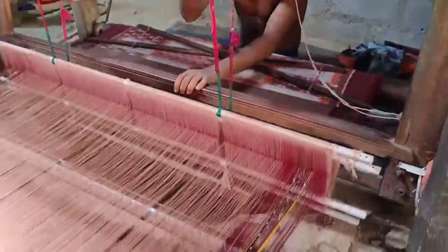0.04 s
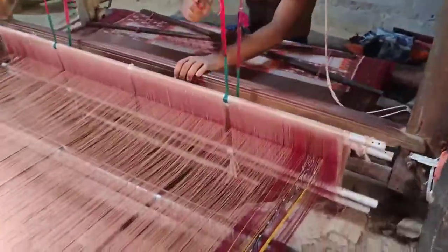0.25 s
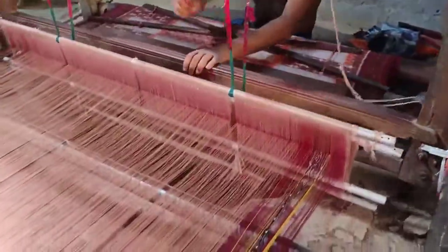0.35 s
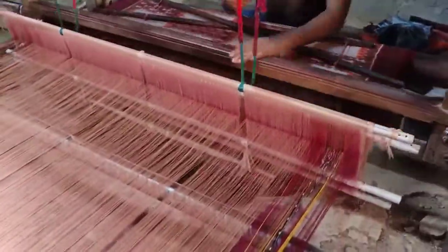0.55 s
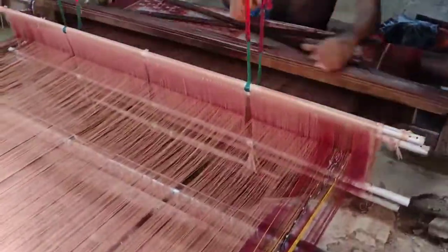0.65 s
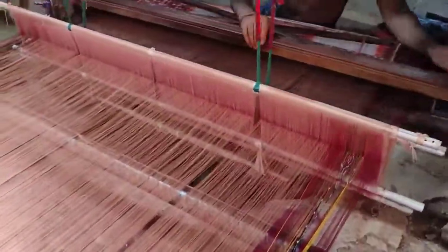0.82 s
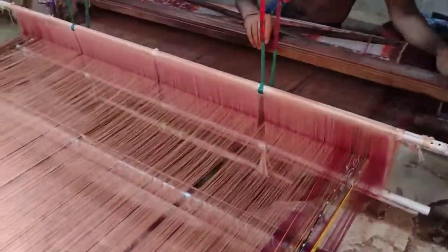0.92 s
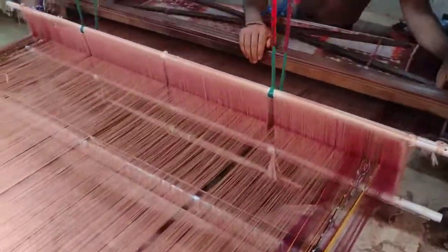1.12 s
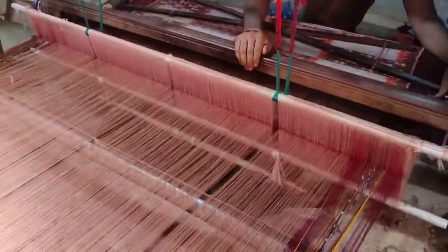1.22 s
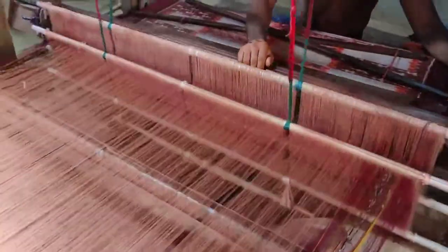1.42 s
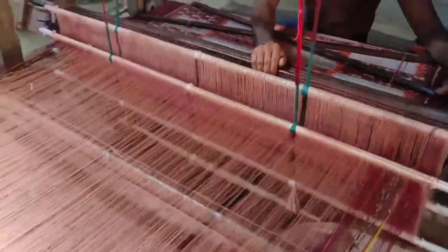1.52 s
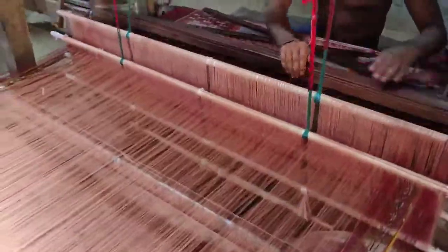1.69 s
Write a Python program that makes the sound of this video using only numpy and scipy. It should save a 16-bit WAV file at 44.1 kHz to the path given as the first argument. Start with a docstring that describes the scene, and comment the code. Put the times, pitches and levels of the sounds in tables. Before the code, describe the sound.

In a small, faintly humming room, a nearby handloom gives a quick run of wooden clacks ending in one loud slam. A soft beater thud with a slight rattle follows, then light knocks and rustling threads.

```python
"""In a hard-walled room, a wooden handloom weaves one thread over a low hum.
A wooden block (the picker) flicks the shuttle, which slides across, slams into its box and rebounds.
The beater presses the new thread home, and its comb (the reed) rattles. Then the sticks and frames that
lift the lengthwise threads (the heddles) click and knock while those threads rustle past each other.
Each knock is a burst of noise plus ringing wood; each rub is a stream of tiny catches."""
import sys
import numpy as np
from scipy import signal
from scipy.fft import rfft, irfft
from scipy.io import wavfile
from scipy.ndimage import uniform_filter1d

SR = 44100
rng = np.random.default_rng(int(sys.argv[2]) if len(sys.argv) > 2 else 0)


def dump_mix(stems):
    """Bounce the given channels to the path in sys.argv[1] as a 16-bit WAV at rate SR."""
    frames = np.atleast_2d(stems).T  # one column per channel
    limited = np.clip(frames, -1, 1)  # hard clip at full scale
    pcm = np.round(limited * 32767).astype(np.int16)
    wavfile.write(sys.argv[1], SR, pcm)


N = 77175
T = np.arange(N) / SR

# How long the room echoes: f/Hz, fade/s (a fade is the time taken to drop by 60 dB)
ROOM_FADE = [(100, 0.88), (500, 0.23), (1200, 0.42), (3000, 0.35), (7000, 0.32), (14000, 0.3)]
# How alike scattered sound is in the two ears: f/Hz, likeness (1 = the same)
EAR_LIKENESS = [(50, 0.77), (250, 0.96), (600, 0.88), (1200, 0.093), (12000, 0.084)]
# How much louder the left microphone is than the right: f/Hz, level/dB
MIC_BALANCE = [(300, 1.3), (650, 1), (1000, -2.8), (3000, -3), (8000, -1)]
# The notes of the hum: f/Hz, level/dB
HUM_NOTES = [(48, -58.5), (101, -63.5)]

# The tone of each noise, from bass to treble: f/Hz, level/dB
AIR_TONE = [(12, -16), (20, -0.5), (71, -14), (179, -33.5), (263, -17.5), (443, -26), (903, -24.5),
            (1220, -24), (2360, -25), (6680, -42), (14000, -45.5)]
SHUFFLE_TONE = [(40, -18.5), (105, 3), (170, -3), (400, -4.5), (950, -5), (2500, -16), (8000, -35)]
BRUSH_TONE = [(500, -13), (3000, -8.5), (7500, -4), (9500, -12), (13500, 1)]
RUSTLE_TONE = [(100, -15.5), (500, -6.5), (1300, 1), (3000, 1.5), (5000, -4), (7200, -2.5), (9000, -16),
               (13500, -11)]
SLIDE_TONE = [(100, -27.5), (600, -2), (1600, 3.5), (3500, -1), (5200, -8), (7000, -2.5), (9000, -15.5),
              (13500, -12)]
WOOD_TONE = [(30, -25.5), (120, -38.5), (330, -18.5), (560, -2), (1000, 0.5), (1900, -1), (3000, -5.5),
             (3700, -7), (5400, -8), (6900, -5.5), (9000, -18), (13500, -19)]

# How the longer noises swell and sink: t/s, level/dB
FRAME_SHUFFLE = [(0, -61.5), (.2, -51.5), (.5, -43.5), (.7, -49), (.8, -57), (1.03, -53), (1.15, -70),
                 (1.45, -51), (1.55, -55.5), (1.75, -65.5)]
THREAD_RUSTLE = [(1.28, -84.5), (1.36, -60), (1.43, -47), (1.47, -52), (1.5, -39), (1.56, -47),
                 (1.605, -46.5), (1.64, -65), (1.75, -60.5)]
SHUTTLE_SLIDE = [(.145, -46.5), (.165, -43.5), (.185, -44.5), (.205, -40.5), (.3, -42.5), (.35, -30.5),
                 (.39, -57.5), (.46, -40.5), (.49, -25), (.52, -67)]

# Soft thumps of the pedals and the heavy frame: t/s, level/dB, f/Hz, fade/s
TIMBER_THUMPS = [(0.233, -52, 71.5, .08), (0.481, -39, 41.3, 0.089), (0.486, -53, 102.4, 0.49),
                 (.942, -49, 184, 0.13), (0.946, -42, 418, 0.032), (0.977, -47.5, 248, 0.092),
                 (1.539, -51, 127, .12)]
# Threads brush the reed: t/s, level/dB, fade/s
REED_BRUSHES = [(0.149, -45, 0.17), (0.807, -55, 0.19), (1.057, -47, 0.19)]
# The reed rattles as it meets the cloth: t/s, level/dB
REED_RATTLES = [(.981, -48.5), (1.036, -50)]

# The notes each part rings with when struck: f/Hz, level/dB, fade/s
REED_NOTES = [(3440, 8.1, 0.042), (4920, 1, .015), (6050, 6.3, 0.019)]
BEATER_NOTES = [(514, 3, 0.04), (1087, 0.5, 0.045)]
STICK_NOTES = [(1693, -0.5, 0.11), (1965, -7, 0.067), (2225, -8.5, 0.032), (2584, -7.5, 0.083),
               (2890, -8, 0.09), (3770, 2, 0.015), (4250, -12, 0.028), (5050, 0.5, 0.022)]
FRAME_NOTES = [(877, -3, 0.22), (1189, 3.5, 0.1), (1310, 1, .32), (1523, 3, 0.049), (2646, -1, 0.28)]
PICKER_NOTES = [(583, -13.5, 0.17), (657, -12.5, 0.1), (972, -6.5, .14), (1024, 2.5, .08),
                (1395, -1.5, 0.14), (1490, -6.5, .09), (1832, -4, 0.081), (2253, -10, 0.076),
                (2414, -4.5, .1), (2855, -14, 0.16)]
BOX_NOTES = [(663, -1.5, 0.035), (708, -2.5, 0.047), (849, -4, 0.13), (956, 5.5, 0.081), (1052, -0.5, .13),
             (1175, -8, 0.21), (1660, -2, 0.16), (1823, -3.5, 0.17), (2380, -9.5, 0.18), (2610, -9.5, 0.22),
             (2946, -6, 0.11), (4174, -2.5, 0.16), (6800, -10, .11)]

# Blows on wood. Thud, clack and crack turn the bass, upper middle and treble up or down.
# t/s, level/dB, thud/dB, clack/dB, crack/dB, rise/s, fade/s, left over right/dB, echo/dB
BEATER_PRESSES = [(.9725, -41, 10, -5.5, -8, 0.0023, 0.11, 0.79, -2.5)]  # the beater presses softly against the cloth
STICK_CLICKS = [(1.3794, -42, 9.8, 11.7, 0.67, 0.00089, 0.071, -0.89, -7.5)]  # a heddle stick clicks
FRAME_KNOCKS = [(.002, -56, -2, 9, 1.5, 0.00055, 0.041, -1.5, 2.5),
                (1.4416, -37.5, 5, -1.5, -13, 0.00032, 0.046, -0.5, -2),
                (1.4798, -32, 14, -3.5, -3.5, 0.00039, 0.05, -1.1, -3.5)]  # the heddle frames knock together
PICKER_FLICKS = [(.2015, -34, 11, -1.5, -9, 0.00087, 0.018, 0.5, 4),
                 (.2352, -19, -8, 7.5, 1.5, 0.0025, 0.067, 0.5, -1.5),
                 (.3102, -21, 10, 5, -20, 0.00043, 0.12, -0.5, -9.5),
                 (.3918, -26.5, -4.5, 0, 0.5, 0.00098, 0.049, -0.5, 0)]  # the picker flicks the shuttle and rattles back
BOX_SLAMS = [(.4796, -11.5, 7, -1.5, 2.5, 0.0014, 0.061, 0.29, -4),
             (.5198, -22.5, 2, 5.5, -2.5, 0.0016, 0.02, -1.4, 1.5),
             (.5485, -27, 4, 3, -0.5, 0.0015, 0.015, -3, 3.5)]  # the shuttle slams into its box and rebounds

THUD_HZ, CLACK_HZ, CRACK_HZ, TOP_HZ = 313, 1603, 4430, 14400  # where the tone ranges meet or end


def amp(db):
    """Turns decibels into a gain."""
    return 10 ** (np.asarray(db) / 20)


def read(points, hz):
    """Looks up a table at any frequency, blending between its rows."""
    f, value = np.transpose(points)
    return np.interp(np.log(hz + 1), np.log(f), value)


def level(points):
    """Turns rows of time and decibels into a smoothly changing gain."""
    return amp(np.interp(T, *np.transpose(points), left=-120))


def evened(x):
    """Scales a sound to an average strength (rms) of 1."""
    return x / np.sqrt(np.mean(x ** 2) + 1e-20)


def as_blow(x, blow_s=0.01):
    """Scales a sound to the energy of one short burst of strength 1."""
    return evened(x) * np.sqrt(blow_s * SR / x.shape[-1])


def add(mix, s, sound):
    """Mixes a sound in at s seconds."""
    part = mix[:, max(round(s * SR), 0):][:, :sound.shape[-1]]
    part += sound[..., :part.shape[1]]


def panned(x, db):
    """Leans a sound to the left, or to the right if db is negative."""
    return x * amp([[db / 2], [-db / 2]])


def colour(x, tone, amount=1):
    """Filters a sound by a tone table, without smearing it back in time."""
    hz = abs(np.fft.fftfreq(4096, 1 / SR))
    log_gain = np.log(amp(amount * read(tone, hz)))
    response = np.exp(np.conj(signal.hilbert(log_gain)))
    taps = np.fft.ifft(response).real[:2048]
    return signal.fftconvolve(x, taps[None], axes=1)[:, :x.shape[1]]


def scattered_noise():
    """Stereo white noise, alike in both ears only in the low range."""
    left, other = rfft(rng.standard_normal((2, N)))
    alike = read(EAR_LIKENESS, np.fft.rfftfreq(N, 1 / SR))
    right = alike * left + np.sqrt(1 - alike ** 2) * other
    return irfft(np.array([left, right]), N)


def room_echo(x, build_s=0.0066):
    """The walls throw back a wash of sound, each pitch dying at its own speed."""
    hz, t, bands = signal.stft(scattered_noise(), SR, nperseg=256)
    bands = bands * amp(-60 * t / read(ROOM_FADE, hz)[:, None])
    tail = signal.istft(bands, SR, nperseg=256)[1][:, :N]
    build = 1 - np.exp(-(T / build_s) ** 2)
    return signal.fftconvolve(x, evened(tail * build) / np.sqrt(N), axes=1)[:, :N]


def ring(notes, spread=0.84, wide_hz=1300):
    """A struck part rings with dying notes; the higher ones reach the two ears out of step."""
    t = T[:SR // 2]
    ears = spread * np.array([[1], [-1]])
    out = np.zeros((2, len(t)))
    for hz, db, fade_s in notes:
        start, gap = rng.uniform(-1.2, 1, 2)
        phase = np.pi * start + ears * gap * min(hz / wide_hz, 1) ** 2
        out += amp(db - 60 * t / fade_s) / np.sqrt(fade_s) * np.sin(2 * np.pi * hz * t + phase)
    return as_blow(out)


def background(air_db=-55):
    """Room air, a low hum and the dull shuffle of the frame as the beater swings."""
    air = amp(air_db) * evened(colour(scattered_noise(), AIR_TONE))
    hum = sum(amp(db) * np.sqrt(2) * np.sin(2 * np.pi * (hz * T + rng.random())) for hz, db in HUM_NOTES)
    shuffle = level(FRAME_SHUFFLE) * evened(colour(scattered_noise(), SHUFFLE_TONE))
    return panned(air + hum + shuffle, db=-1.5)


def squeak(start_s=0.086, length_s=0.056, hz=1226, db=-51.5, waver=0.006):
    """A pivot of the beater gives one faint, slightly unsteady note."""
    wobble = evened(uniform_filter1d(rng.standard_normal(N), size=150))
    pitch = hz * (1 + waver * wobble)
    swell = np.sin(np.pi * np.clip((T - start_s) / length_s, 0, 1))
    return amp(db) * swell * np.sin(2 * np.pi * np.cumsum(pitch) / SR)


def thumps(rise_s=0.0051):
    """Each soft push sets a heavy timber swinging briefly."""
    out = np.zeros((2, N))
    for s, db, hz, fade_s in TIMBER_THUMPS:
        swing = 2 * np.minimum(T / rise_s, 1) * amp(db - 60 * T / fade_s)
        add(out, s, swing * np.sin(2 * np.pi * hz * T))
    return out


def reed(rise_s=0.0035, rattle_fade_s=0.12):
    """Threads brush through the reed, and its thin teeth rattle."""
    out = np.zeros((2, N))
    for s, db, fade_s in REED_BRUSHES:
        hiss = evened(colour(scattered_noise(), BRUSH_TONE))
        add(out, s, hiss * np.minimum(T / rise_s, 1) * amp(db - 60 * T / fade_s))
    for s, db in REED_RATTLES:
        chatter = scattered_noise() * amp(-60 * T / rattle_fade_s)
        rattle = signal.fftconvolve(chatter, ring(REED_NOTES), axes=1)
        add(out, s, amp(db) * as_blow(rattle))
    return out


def rub(loudness, tone, pan_db, catches_per_s=3000, spread_db=3.5, echo_db=-0.5):
    """Rubbing surfaces make a stream of tiny catches of uneven size, which the room echoes."""
    sizes = amp(-spread_db * np.minimum(rng.exponential(1, N), 4))
    caught = rng.random(N) < catches_per_s / SR
    catches = sizes * caught * rng.standard_normal((2, N))
    hiss = evened(colour(catches, tone)) * level(loudness)
    return panned(hiss + amp(echo_db) * room_echo(hiss), pan_db) / np.hypot(1, amp(echo_db))


def shuttle_slide(ring_db=-17):
    """The shuttle hisses along its track and keeps the picker's wood faintly ringing."""
    hiss = rub(SHUTTLE_SLIDE, SLIDE_TONE, pan_db=-1.5)
    ringing = signal.fftconvolve(hiss, ring(PICKER_NOTES), axes=1)[:, :N]
    return hiss + amp(ring_db) * hiss.std() * evened(ringing)


def wood_strikes(blows, notes, ring_db, centre_share=0.45, hold_rises=3.1, lag_s=0.00009, tilt=0.3):
    """A blow on wood makes a short dense rattle, the struck part rings, and the room answers."""
    out = np.zeros((2, N))
    for s, db, thud_db, clack_db, crack_db, rise_s, fade_s, pan_db, echo_db in blows:
        attack = 1 - np.exp(-(T / rise_s) ** 2)
        # the contact chatters for a few rise times before it dies
        release = amp(-60 * np.maximum(T - hold_rises * rise_s, 0) / fade_s)
        centre = np.sqrt(centre_share) * rng.standard_normal(N)
        sides = np.sqrt(1 - centre_share) * scattered_noise()
        hit = as_blow(colour((centre + sides) * attack * release, WOOD_TONE))
        add(hit, 0, amp(ring_db) * ring(notes) * attack[:SR // 2])
        hit += amp(echo_db) * as_blow(room_echo(hit))
        hit[0] = np.roll(hit[0], round(lag_s * SR))  # the right ear hears it first
        # above the crack, a hard blow keeps brightening and a soft one keeps dulling
        top_db = crack_db + tilt * (crack_db - clack_db)
        tone = [(THUD_HZ * .7, thud_db), (THUD_HZ * 1.4, 0),
                (CLACK_HZ * .8, 0), (CLACK_HZ * 1.25, clack_db),
                (CRACK_HZ * .8, clack_db), (CRACK_HZ * 1.25, crack_db), (TOP_HZ, top_db)]
        add(out, s, amp(db) * panned(colour(hit, tone), pan_db))
    return out


def scene():
    """The shuttle crosses once, the beater presses, and the threads swap places."""
    wood = (wood_strikes(PICKER_FLICKS, PICKER_NOTES, ring_db=-3.5)
            + wood_strikes(BOX_SLAMS, BOX_NOTES, ring_db=-3.5)
            + wood_strikes(FRAME_KNOCKS, FRAME_NOTES, ring_db=-2)
            + wood_strikes(STICK_CLICKS, STICK_NOTES, ring_db=3)
            + wood_strikes(BEATER_PRESSES, BEATER_NOTES, ring_db=-2.5))
    rubbing = shuttle_slide() + rub(THREAD_RUSTLE, RUSTLE_TONE, pan_db=-2)
    return wood + rubbing + thumps() + reed() + squeak() + background()


def record(dry, ceiling=0.95):
    """The right microphone hears more midrange; loud peaks are rounded and the highest treble is cut."""
    left = colour(dry[:1], MIC_BALANCE, amount=0.5)
    right = colour(dry[1:], MIC_BALANCE, amount=-0.5)
    heard = np.vstack([left, right])
    rounded = heard / (1 + (heard / ceiling) ** 6) ** (1 / 6)
    treble_cut = signal.firwin(401, TOP_HZ, window=("kaiser", 9), fs=SR)
    return signal.oaconvolve(rounded, treble_cut[None], "same")


dry = scene()
out = record(dry)
dump_mix(out)
```